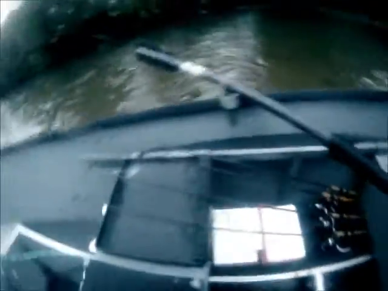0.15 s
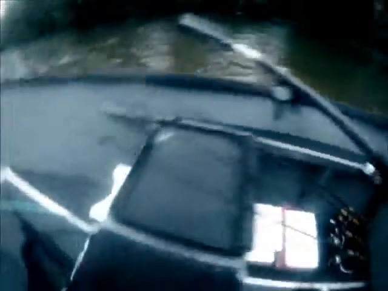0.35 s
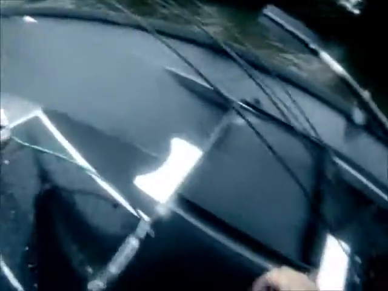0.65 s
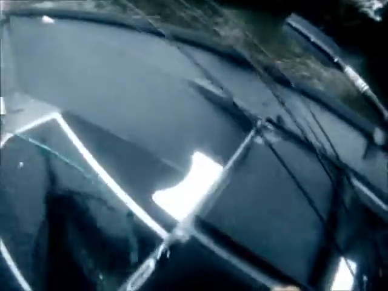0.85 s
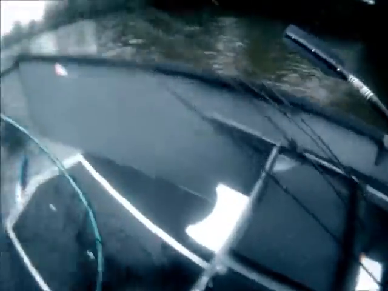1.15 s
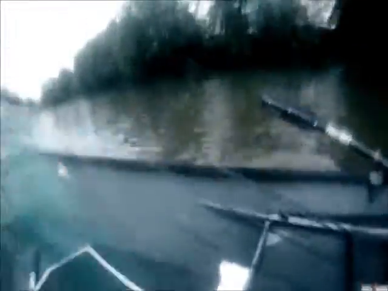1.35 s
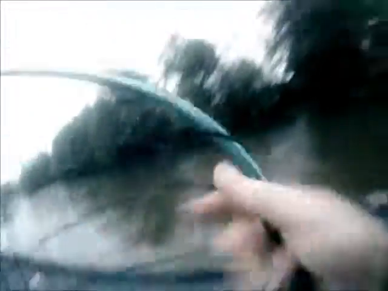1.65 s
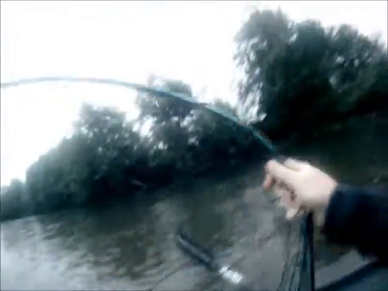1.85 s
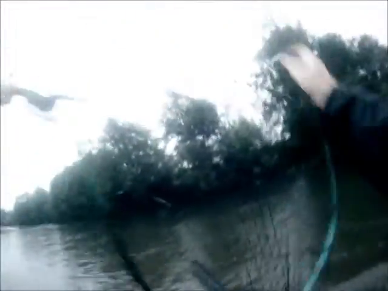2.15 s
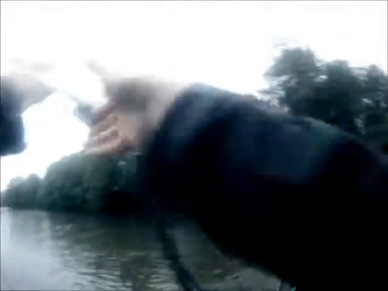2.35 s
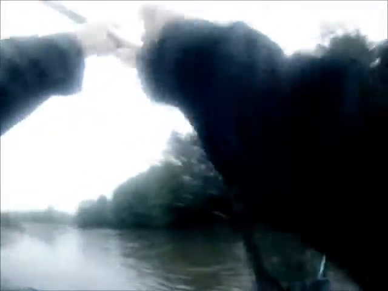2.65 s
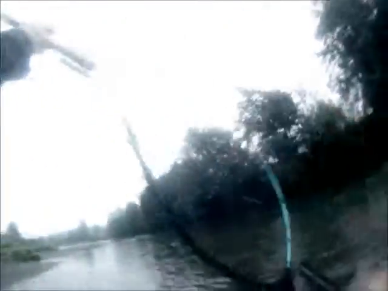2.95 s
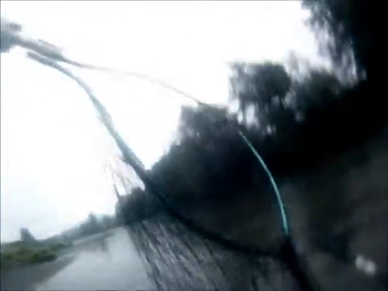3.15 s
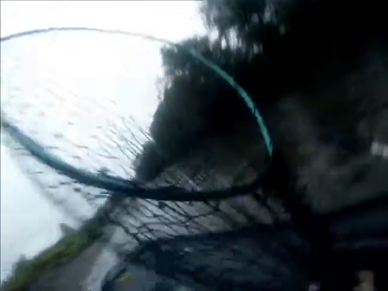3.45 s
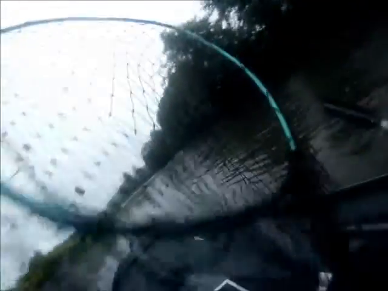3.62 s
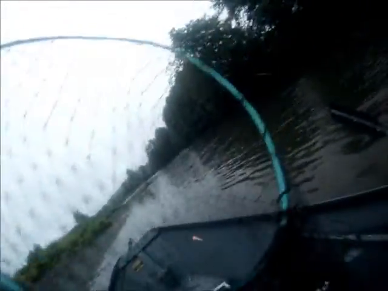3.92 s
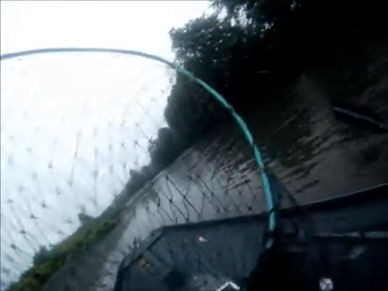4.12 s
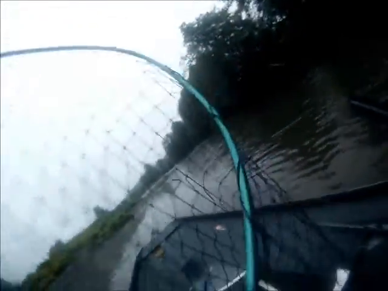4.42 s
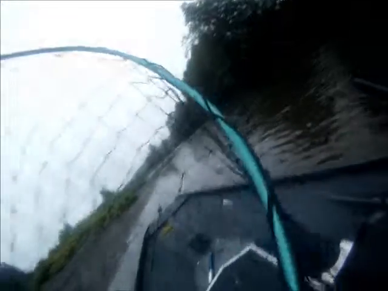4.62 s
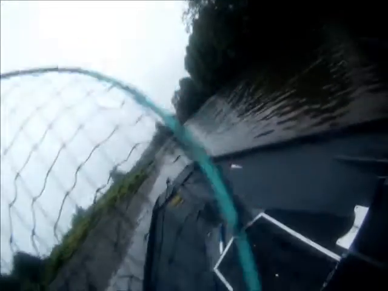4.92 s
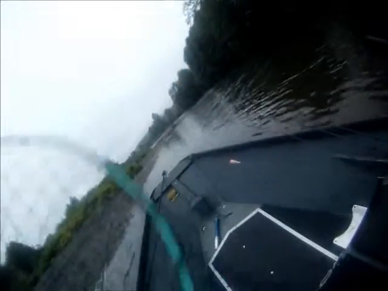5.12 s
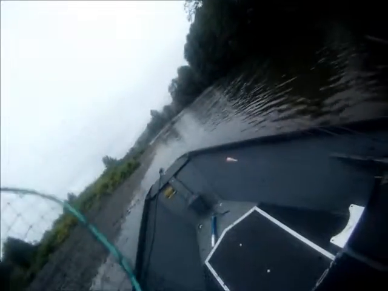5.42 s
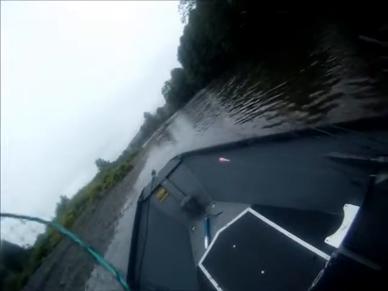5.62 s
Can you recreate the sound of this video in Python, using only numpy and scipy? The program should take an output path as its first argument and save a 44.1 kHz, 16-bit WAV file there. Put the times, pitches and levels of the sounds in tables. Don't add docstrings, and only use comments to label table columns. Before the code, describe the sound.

Close, boxy cloth rustling and bumps in uneven swells on a small river boat, a hard clipped knock early, fading to light taps and faint water.

```python
import sys
import numpy as np
from scipy import signal
from scipy.io import wavfile

SR = 44100
rng = np.random.default_rng(int(sys.argv[2]) if len(sys.argv) > 2 else 0)


def to_wav(sig):
    pcm = np.clip(np.atleast_2d(sig), -1, 1) * 32767
    pcm = np.round(pcm).astype(np.int16)
    wavfile.write(sys.argv[1], SR, pcm.T)


def makeup_ratio(level_db):
    decades = np.asarray(level_db, float) / 20
    return 10 ** decades


N = 254898
KNOCK_S = 1.4687
MEAN_RUB_DB = -45

# frequency in Hz, width in Hz, level in dB.
CASE = [
    (450, 180, -2),
    (628, 110, 8.5),
    (1100, 250, 7),
    (1670, 160, -5),
    (1950, 430, 11.5),
    (2220, 310, 7),
    (3020, 99, 1),
    (3410, 130, 6.5),
]


def peaks(x, table):
    for hz, width_hz, db in table:
        w = 2 * np.pi * hz / SR
        a = makeup_ratio(db / 2)
        k = np.sin(w) * width_hz / hz / 2
        middle = -2 * np.cos(w)
        x = signal.lfilter([1 + k * a, middle, 1 - k * a], [1 + k / a, middle, 1 - k / a], x)
    return x


def band(x, low_hz, high_hz, order=2):
    return signal.sosfilt(signal.butter(order, [low_hz, high_hz], "band", fs=SR, output="sos"), x)


def rms_one(x):
    return x / np.sqrt(np.mean(x ** 2) + 1e-20)


def drift(rate):
    r = np.exp(-40 * np.pi * rate / SR)
    noise = rng.standard_normal(N // 20 + 2002)
    slow = signal.lfilter([1], [1, -2 * r, r * r], noise)[2000:]
    return np.interp(np.arange(N) / 20, np.arange(len(slow)), rms_one(slow))


def add(out, s, sound):
    at = round(s * SR)
    out[at:at + len(sound)] += sound[:N - at]


def ring(hz, t60, rise=0., build=.0003):
    t = np.arange(round(t60 * SR)) / SR
    onset = 1 - np.exp(-(t / max(build, 1e-4)) ** 2)
    return onset * makeup_ratio(-60 * t / t60) * np.sin(2 * np.pi * hz * (t + rise * t * t / t60))


def friction(edges, shared_db, own_db, grain_db):
    snags_per_s, snag_db = 76, 8
    slips = rng.standard_normal((2, N)) * makeup_ratio(grain_db * drift(250))
    slips += makeup_ratio(snag_db) * rng.standard_normal(N) * (rng.random(N) < snags_per_s / SR)
    together = shared_db * (drift(22) + .5 * drift(42))
    out = np.zeros(N)
    for k, (low, high) in enumerate(zip(edges, edges[1:])):
        out += band(slips[k % 2], low, high) * makeup_ratio(together + own_db * drift(6.2))
    return out


def swells(rows, rest_db):
    t = np.arange(0, N, 32) / SR
    power = makeup_ratio(2 * rest_db)
    for s, db, build, release in rows:
        away = np.where(t < s, (s - t) / max(build, .01), (t - s) / max(release, .01))
        power = power + makeup_ratio(2 * (db - 10 * away ** 1.14))
    return np.interp(np.arange(N) / SR, t, 10 * np.log10(power))


def pressure_db(crisp_share=0, drags=()):
    # peak in seconds, level in dB, build in seconds, release in seconds, crispness in dB.
    reach = [(0.0, -48.5, .05, 0.048, 9), (0.22, -43, 0.094, 0.051, 6), (.39, -45.5, 0.056, 0.069, 1.5),
             (.44, -44, .03, .05, -2), (.495, -39, 0.062, 0.096, -0.5), (.55, -40, .05, .06, 4),
             (0.65, -34, 0.035, 0.06, 2), (.74, -45.5, 0.034, 0.055, 2.5), (.8, -42.5, 0.059, 0.11, 1.5),
             (.935, -38, 0.039, 0.03, 6.5), (1.04, -40, 0.095, 0.04, -2.5), (1.1, -43.5, .05, 0.051, -4),
             (1.18, -39, 0.066, 0.043, -9), (1.33, -39, 0.076, 0.086, 4), (1.409, -36.5, 0.092, 0.09, -6.5),
             (1.652, -38, 0.05, 0.044, 3.5), (1.74, -47, 0.06, 0.1, 3.5), (1.86, -34, 0.055, 0.03, 1),
             (1.893, -38, .03, .012, 3), (2.061, -39.5, 0.13, 0.14, -2), (2.185, -39, .02, .03, 0),
             (2.226, -32.5, 0.03, 0.022, -0.5), (2.27, -42, .03, .03, 0), (2.31, -43.5, 0.069, 0.049, 6),
             (2.532, -28.5, 0.11, 0.11, 1), (2.68, -42.5, 0.047, 0.091, -5), (2.89, -33, 0.036, 0.071, -4),
             (2.75, -46, 0.043, .03, -6), (2.845, -41, .045, .03, -2), (2.96, -29, 0.085, 0.037, 1.5),
             (3.016, -31, 0.15, 0.015, 5), (3.1, -41, 0.079, 0.11, -1), (3.283, -44, 0.069, 0.045, -1)]
    # peak in seconds, level in dB, build in seconds, release in seconds, crispness in dB.
    sway = [(3.2, -47.5, 0.09, 0.025, -9), (3.37, -46.5, 0.043, 0.048, -7), (3.416, -44, 0.049, 0.024, -4),
            (3.48, -56, 0.026, .03, 0), (3.64, -50, 0.037, 0.027, -3), (3.545, -42.5, 0.081, .12, -3),
            (3.745, -52, .02, .03, 3), (3.836, -48.5, 0.083, 0.033, 4), (4.02, -48, 0.03, .02, 1),
            (4.055, -45, 0.03, 0.03, 3.5), (4.18, -49.5, 0.031, 0.043, 0), (4.261, -49.5, 0.056, 0.054, 1),
            (4.405, -48, 0.044, 0.058, 3.5), (4.53, -47, 0.03, 0.097, -0.5), (4.673, -45, 0.09, 0.018, -4),
            (4.76, -53, 0.12, 0.04, 3), (4.84, -51.5, 0.057, 0.075, 8), (4.96, -50.5, 0.021, 0.045, 2),
            (5.04, -45.5, .05, 0.061, -2), (5.148, -51, 0.026, 0.082, -1), (5.272, -56.5, 0.047, 0.026, 6),
            (5.575, -50, 0.071, 0.063, 5), (5.764, -53, 0.057, .05, -3)]
    strokes = []
    for s, db, build, release, crisp_db in [*reach, *sway]:
        strokes.append((s, db + crisp_share * crisp_db, build, release))
    return swells(strokes + list(drags), rest_db=-63)


def rubbing():
    # peak in seconds, level in dB, build in seconds, release in seconds.
    mesh_drags = [(.02, -48, .03, .04), (1.84, -42, .05, .06), (.905, -37, .01, .03),
                  (.925, -29.5, 0.022, 0.054), (1.195, -41, .01, 0.043), (1.441, -35, 0.024, .05),
                  (2.35, -46, 0.022, 0.051), (2.47, -36.5, 0.13, .12), (4.039, -50.5, 0.029, 0.037),
                  (4.74, -48, .02, .08), (4.86, -46, .04, 0.043)]
    # time in seconds, level in dB.
    flat_cloth = [(0, 3), (.2, 3), (.4, 1), (.85, 4), (1.25, 2), (1.7, 0.5), (2.2, -3), (2.7, 1),
                  (3.199, -1), (3.7, -5.5), (4.2, -0.5), (4.8, 0.5), (5.3, 0), (5.78, 0)]
    finer_drags = [(s, db + 5, *flanks) for s, db, *flanks in mesh_drags]

    body_db = pressure_db()
    dull_db = -60 + 0.89 * (body_db - MEAN_RUB_DB)
    dull_db += np.interp(np.arange(N) / SR, *np.transpose(flat_cloth))
    crisp_db = -12.5 + pressure_db(crisp_share=0.91, drags=mesh_drags)
    fine_db = -67 + 0.93 * (pressure_db(crisp_share=.9, drags=finer_drags) - MEAN_RUB_DB)

    dull = friction(np.geomspace(430, 850, 3), shared_db=-0.1, own_db=1.06, grain_db=0.5)
    body = friction(np.geomspace(850, 2700, 6), shared_db=1.2, own_db=0.98, grain_db=0.5)
    crisp = friction(np.geomspace(2700, 4000, 3), shared_db=0.85, own_db=1.75, grain_db=1.5)
    crisp = signal.sosfilt(signal.cheby1(8, 1, 3800, fs=SR, output="sos"), crisp)
    fine = friction(np.geomspace(3900, 5900, 3), shared_db=.8, own_db=.8, grain_db=.8)

    out = np.zeros(N)
    for db, part in [(body_db, body), (dull_db, dull), (crisp_db, crisp), (fine_db, fine)]:
        out += makeup_ratio(db) * rms_one(peaks(part, CASE))
    return out


def knock():
    # frequency in Hz, level in dB, 60 dB decay in seconds, build-up in seconds.
    knock_modes = [(103, -3.5, 0.07, 0.0011), (300, 10.5, 0.014, 0.00031), (542, 16, 0.011, 0.00038),
                   (860, 14.5, 0.011, 0.00049), (1170, 22, 0.013, 0.002), (1390, 14.5, 0.014, 0.0005),
                   (200, -6, .05, .002), (1985, 25.5, 0.021, 0.0057), (2252, 19, 0.017, 0.0031),
                   (3960, 9, 0.0047, 0.00098), (540, -15, .15, .001), (745, -9, 0.1, .001)]
    out = np.zeros(N)
    add(out, 1.4679, makeup_ratio(-1.5) * ring(2600, 0.0086, build=0.000054))
    add(out, KNOCK_S - .0004, makeup_ratio(11.5) * ring(1500, 0.0033, build=.0001))
    for hz, db, t60, build in knock_modes:
        add(out, KNOCK_S, -makeup_ratio(db) * ring(hz, t60, build=build))
    rattle = band(rng.standard_normal(SR // 20), 93, 5800, order=1)
    t = np.arange(len(rattle)) / SR
    add(out, KNOCK_S, makeup_ratio(4 - 60 * t / .048) * rattle)
    return out


def shaking():
    # peak in seconds, level in dB, build in seconds, release in seconds.
    nods = [(.145, -52, 0.087, .08), (.275, -51, 0.12, 0.053), (.495, -33, 0.061, 0.03),
            (.66, -36.5, 0.11, 0.094), (.905, -41.5, 0.17, 0.18), (1.13, -43.5, 0.16, 0.21),
            (1.41, -43, 0.14, 0.19), (1.665, -44.5, 0.13, 0.032), (1.87, -43, .12, 0.084),
            (2.14, -47, 0.25, 0.12), (2.28, -39.5, 0.055, 0.11), (2.48, -41, 0.17, 0.36),
            (2.65, -57, 0.11, 0.12), (2.98, -30.5, 0.13, 0.047), (3.045, -49, 0.018, .02),
            (3.17, -48.5, 0.15, 0.045), (3.39, -47.5, 0.031, 0.046), (3.52, -42.5, 0.12, 0.11),
            (3.99, -60.5, 0.23, 0.084), (4.17, -58.5, 0.046, 0.26), (4.4, -55, 0.076, 0.12),
            (4.56, -51, 0.094, 0.11), (4.76, -53, 0.082, 0.15), (5.065, -53, 0.41, 0.12),
            (5.3, -60.5, 0.073, 0.061), (5.535, -56.5, 0.059, 0.11), (5.76, -61, .08, 0.077)]
    # frequency in Hz, width in Hz, level in dB.
    strap = [
        (40, 34, -2),
        (107, 19, 9.5),
        (241, 36, 5),
    ]
    low_db = swells(nods, rest_db=-76.5)
    mean_nod_db = -48
    upper_db = -56.5 + 0.51 * (pressure_db() - MEAN_RUB_DB) + 0.41 * (low_db - mean_nod_db)
    low = friction(np.geomspace(22, 170, 4), shared_db=2.1, own_db=2.5, grain_db=0.5)
    upper = friction(np.geomspace(170, 305, 3), shared_db=2.5, own_db=0.0, grain_db=-0.2)
    return makeup_ratio(low_db) * rms_one(peaks(low, strap)) + makeup_ratio(upper_db) * rms_one(peaks(upper, strap))


def thumps():
    # start in seconds, peak in dB, frequency in Hz, 60 dB decay in seconds.
    jolts = [(0.471, -37, 219, 0.066), (.655, -31, 110, 0.074), (.868, -32, 120, 0.082),
             (.908, -30.5, 165, 0.11), (.906, -40, 450, 0.061), (.917, -35, 290, .07),
             (0.929, -42, 372, 0.25), (.94, -33, 190, 0.14), (.995, -34, 180, 0.12),
             (1.045, -34.5, 244, 0.099), (1.115, -43, 167, 0.074), (1.418, -39.5, 265, 0.041),
             (2.17, -31, 38, 0.21), (2.168, -38, 300, .04), (2.325, -43, 140, .07), (2.36, -46, 387, 0.076),
             (3.04, -33, 55, .1), (3.25, -44, 45, .2), (5.06, -43, 80, .1), (2.513, -35, 240, 0.045),
             (2.853, -36, 164, .07), (2.906, -34, 130, 0.096), (3.475, -34.5, 110, .08),
             (3.7017, -32, 124, .05), (4.13, -43.5, 29.84, .3), (4.21, -43.5, 35, .2),
             (4.719, -33.5, 95, 0.085), (4.733, -33.5, 45, 0.13), (4.838, -40, 190, .07)]
    out = np.zeros(N)
    for s, db, hz, t60 in jolts:
        add(out, s, -makeup_ratio(db) * ring(hz, t60, build=0.24 / hz))
    return out


def taps():
    # start in seconds, peak in dB, ring in Hz, 60 dB decay in seconds, contact in seconds.
    light_taps = [(0.357, -34, 1176, 0.055, 0.0017), (0.924, -25, 1830, 0.023, 0.0012),
                  (.937, -22, 1920, 0.016, 0.0017), (1.014, -13, 2130, 0.035, 0.0027),
                  (2.217, -40, 1930, 0.024, 0.00093), (3.062, -30, 2030, 0.027, .0006),
                  (3.477, -29, 2070, 0.027, 0.00053), (3.515, -36.5, 1130, 0.027, 0.00033),
                  (2.229, -20, 2100, .02, 0.0015), (2.445, -21, 2000, .02, .001),
                  (3.698, -31, 2170, 0.029, 0.0012), (3.701, -34, 1150, 0.022, 0.0015),
                  (3.7955, -36, 1940, 0.022, 0.00047), (3.828, -33, 2370, 0.021, 0.00037),
                  (3.902, -34.5, 2060, 0.011, 0.00044), (3.927, -45, 2043, .03, 0.0011),
                  (4.164, -33, 1970, 0.033, 0.0037), (4.18, -28, 2095, 0.012, 0.00031),
                  (4.243, -39.5, 2020, 0.061, 0.0032), (4.258, -31.5, 2010, 0.017, 0.0008),
                  (5.021, -25, 1900, 0.008, 0.00041), (3.357, -37, 2050, .02, .0006),
                  (3.516, -31, 2100, .025, .0005)]
    puffs, rings = np.zeros(N), np.zeros(N)
    t = np.arange(400) / SR
    for s, db, hz, t60, contact in light_taps:
        onset = 1 - np.exp(-t / max(contact, 1e-4))
        add(puffs, s, onset * makeup_ratio(db - 9.5 - 60 * t / 0.023) * rng.standard_normal(len(t)))
        panel_t60 = max(t60, .005)
        add(rings, s, makeup_ratio(db) * ring(hz, panel_t60, build=contact))
        add(rings, s, makeup_ratio(db - 6) * ring(hz * 0.55, panel_t60 * 0.27, build=contact))
    return peaks(band(puffs, 1100, 3250), CASE) + rings


def ticks():
    # start in seconds, peak in dB, ring in Hz, ring level in dB relative to the spray.
    flicks = [(0.212, -43, 3320, -4), (0.801, -38, 3470, -3), (0.8925, -33, 3160, 2.5),
              (0.9153, -28.5, 3680, -1), (1.013, -36, 3500, 12.5), (1.2, -54, 3640, 13),
              (1.1897, -44, 3670, 8), (1.195, -50, 4020, 9), (4.18, -50, 3500, 1), (5.021, -48, 3250, 12),
              (1.6805, -35, 3450, -10), (1.766, -32, 3550, 2), (2.1304, -35.5, 3170, -5),
              (2.344, -28, 3670, -14), (2.472, -40, 3340, -3), (2.632, -38, 3370, -5),
              (2.708, -36, 3130, -6), (2.801, -45, 3350, -9), (2.877, -35, 3380, -5),
              (3.067, -36, 3620, -11), (3.116, -49, 3370, 7), (3.149, -46, 3600, -9),
              (3.196, -40.5, 3360, -6), (3.28, -46, 3400, 11), (3.419, -37, 3380, -6),
              (3.4695, -45, 3180, 3), (3.5594, -49, 3520, -1), (3.739, -50, 3560, 0.5),
              (3.795, -41.5, 3600, 2), (3.827, -44, 3700, 8), (4.035, -47, 3640, 1.5),
              (4.053, -49, 3540, -6), (4.115, -47.5, 3400, -10.5), (4.848, -47, 3200, 5),
              (3.698, -48, 3400, -3), (2.401, -40, 3500, -8), (2.159, -44, 3500, -8),
              (2.941, -32, 3500, -8), (1.579, -46, 3500, -8), (4.163, -50, 3500, -5),
              (1.697, -45, 3500, -8), (2.59, -39, 3500, -8), (2.512, -36, 3500, -8), (2.358, -39, 3500, -8),
              (3.747, -49, 3500, -5), (3.43, -46, 3500, -8), (2.638, -41, 3500, -8)]
    tick_s = 0.011
    out = np.zeros(N)
    fade = makeup_ratio(-20 * np.arange(2000) / SR / tick_s)
    for s, db, hz, ring_db in flicks:
        spray = rms_one(band(rng.standard_normal(len(fade)), 2700, 9600))
        add(out, s, makeup_ratio(db - 2.5) * spray * fade)
        add(out, s, makeup_ratio(db + ring_db - 3.0) * ring(hz, tick_s * 3, build=0.00071))
    return out


def water():
    # start in seconds, peak in dB, frequency in Hz, 60 dB decay in seconds.
    plops = [(4.803, -40, 616, .03), (4.805, -40, 910, 0.029), (4.84, -38, 390, 0.025),
             (4.85, -39, 480, 0.03), (4.858, -43, 600, .02), (4.878, -42, 270, .05),
             (5.023, -40, 1300, .035), (4.954, -43, 1135, .03), (5.203, -42, 640, 0.019),
             (5.205, -47, 780, 0.028), (5.257, -46.5, 1228, 0.061), (5.268, -46, 1230, 0.077)]
    rush = friction(np.geomspace(250, 3800, 6), shared_db=3.5, own_db=-2.5, grain_db=1.5)
    rush = signal.lfilter([1], [1, -.8], rush)
    out = makeup_ratio(-61.5) * rms_one(peaks(rush, CASE))
    lapping = band(rng.standard_normal(N), 15, 140) * makeup_ratio(2.2 * drift(7))
    out += makeup_ratio(-59.5) * rms_one(lapping)
    for s, db, hz, t60 in plops:
        add(out, s, makeup_ratio(db) * ring(hz, t60, rise=0.053, build=0.0014))
    return out


def bird():
    # start in seconds, length in seconds, start pitch in Hz, end pitch in Hz, level in dB.
    whistles = [
        (5.328, .012, 4950, 4800, -61),
        (5.333, .014, 4600, 4450, -60),
        (5.351, .025, 4120, 3930, -55),
        (5.372, .04, 3890, 3870, -63),
        (5.484, .04, 3890, 3880, -56),
        (5.54, .022, 3080, 3050, -55),
        (5.59, .016, 4750, 4700, -60),
    ]
    out = np.zeros(N)
    for s, length, start_hz, end_hz, db in whistles:
        u = np.linspace(0, 1, round(length * SR))
        hz = end_hz + (start_hz - end_hz) * (1 - u) ** 4
        level = makeup_ratio(db - 2.5 - 4.8 * u) * np.sin(np.pi * u ** 0.48)
        add(out, s, level * np.sin(2 * np.pi * np.cumsum(hz) / SR))
    return out * makeup_ratio(1.54 * drift(90))


def scene():
    hiss = makeup_ratio(-61) * rng.standard_normal(N)
    handling = rubbing() + knock() + shaking() + thumps() + taps() + ticks()
    return (handling + water() + bird() + hiss)[None]


def top_cut(x):
    return signal.sosfilt(signal.butter(12, 15800, fs=SR, output="sos"), x)


def record(dry):
    duck_lag_s, recover_s = .0078, 0.041
    since = np.maximum(np.arange(N) / SR - KNOCK_S - duck_lag_s, 0)
    duck_db = 25 * (1 - np.exp(-since / 0.0008))
    duck_db += 14 * (1 - np.exp(-(since / .015) ** 2))
    duck_db *= np.exp(-(since / recover_s) ** 2 / 2)
    ducked = np.clip(dry * makeup_ratio(-duck_db), -1.6, 1.6)
    smooth = signal.sosfilt(signal.butter(6, 5550, fs=SR, output="sos"), ducked)
    slow = np.clip(signal.resample_poly(smooth, 40, 147, axis=1), -1.02, 1.02)
    held = signal.resample_poly(np.repeat(slow, 4, axis=1), 147, 160, axis=1)
    held = np.pad(held, ((0, 0), (0, 8)))[:, :N]
    held = signal.sosfilt(signal.cheby2(9, 30, 15650, fs=SR, output="sos"), held)
    return top_cut(np.clip(held, -1, 1))


dry = scene()
out = record(dry)
to_wav(out)
```